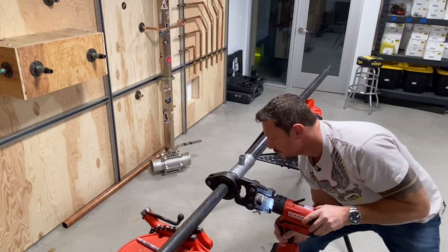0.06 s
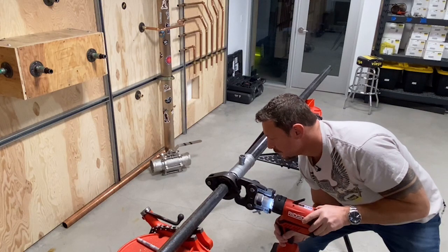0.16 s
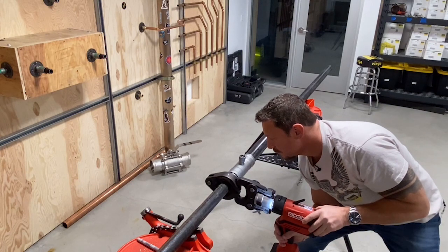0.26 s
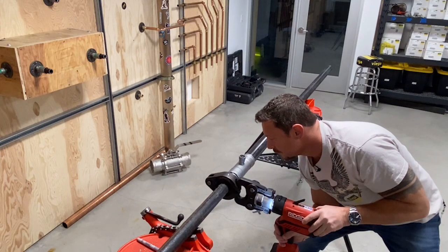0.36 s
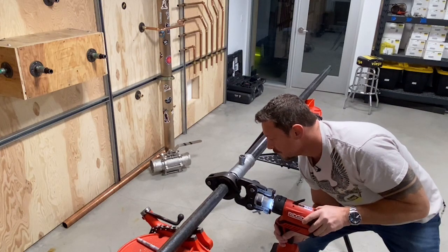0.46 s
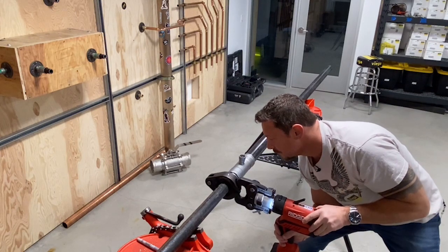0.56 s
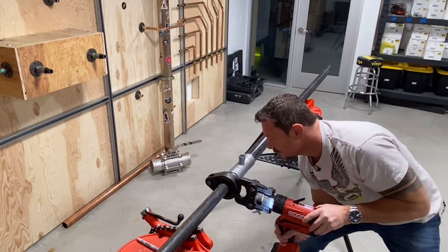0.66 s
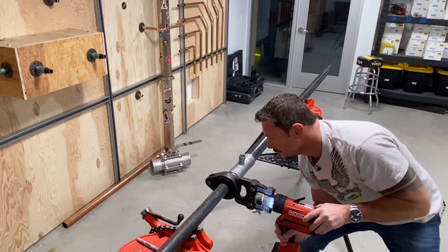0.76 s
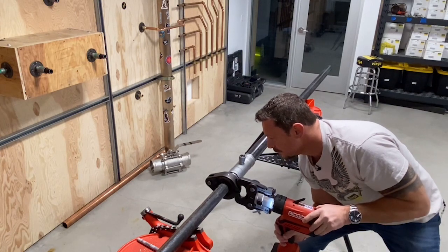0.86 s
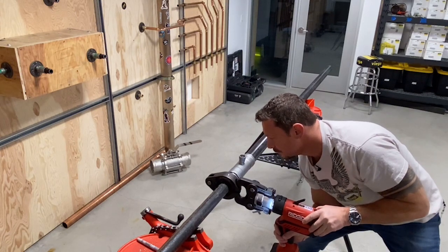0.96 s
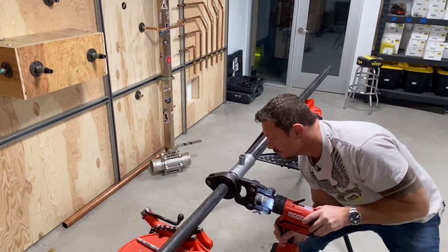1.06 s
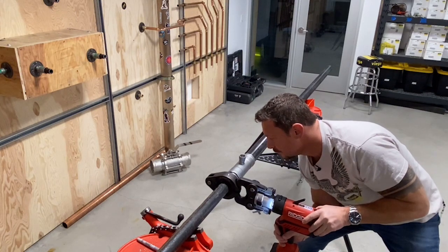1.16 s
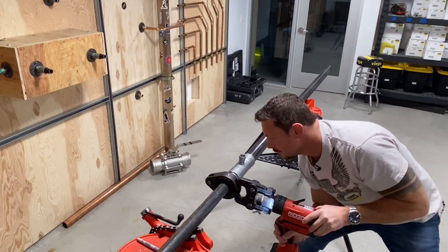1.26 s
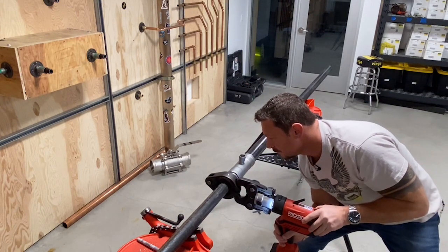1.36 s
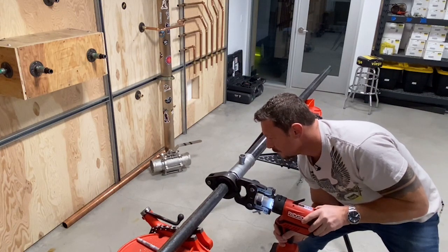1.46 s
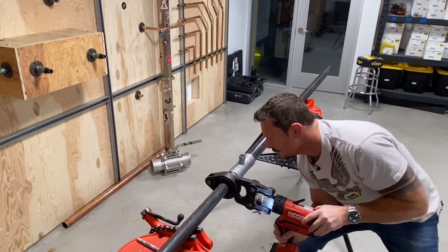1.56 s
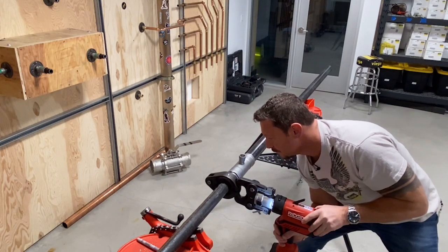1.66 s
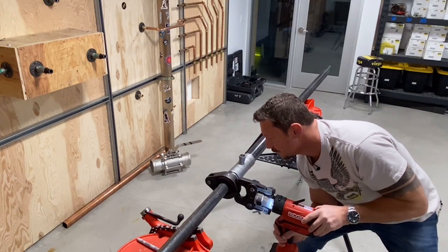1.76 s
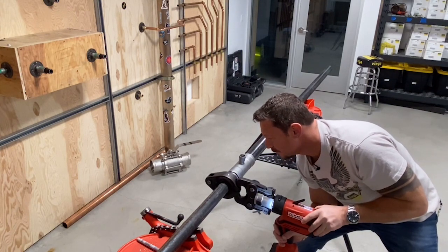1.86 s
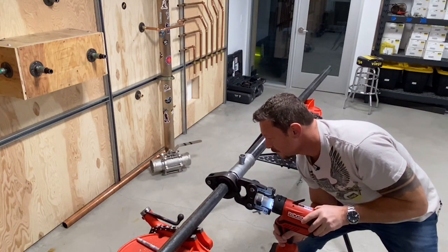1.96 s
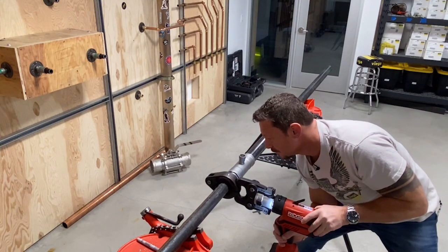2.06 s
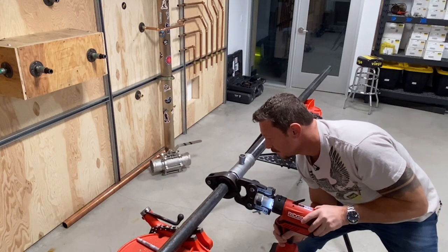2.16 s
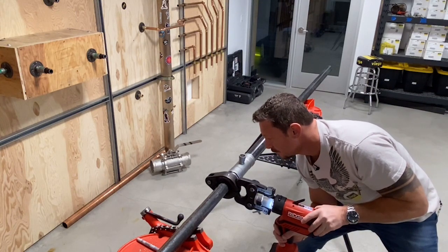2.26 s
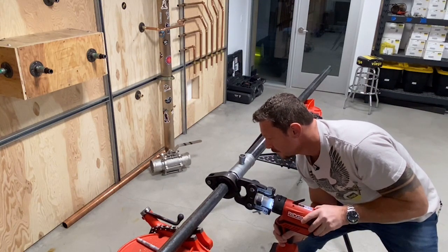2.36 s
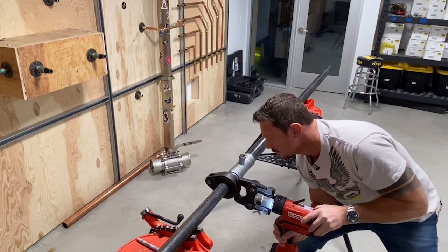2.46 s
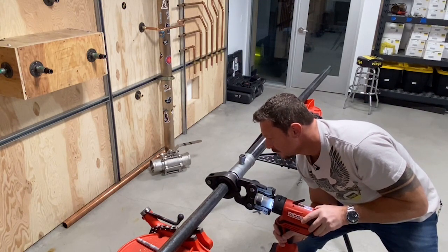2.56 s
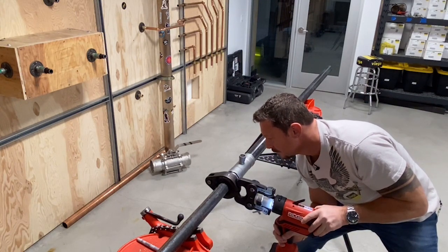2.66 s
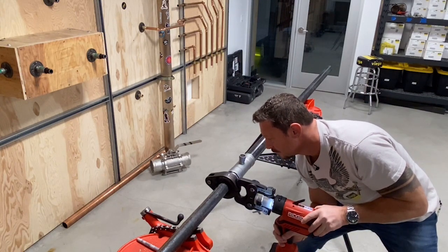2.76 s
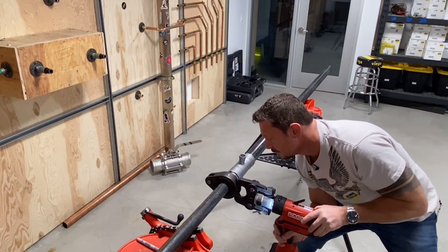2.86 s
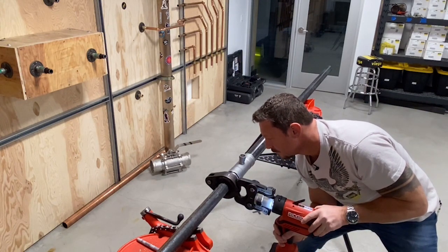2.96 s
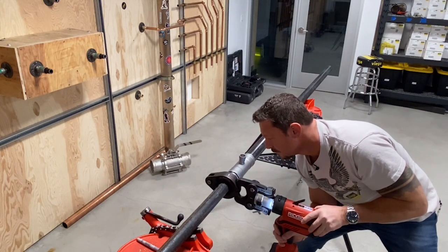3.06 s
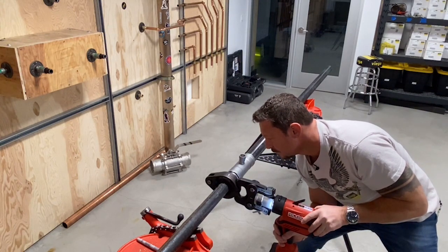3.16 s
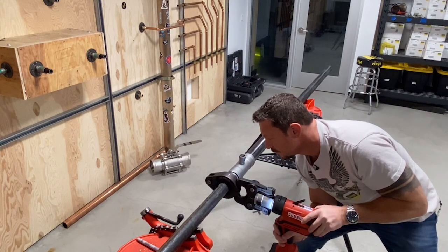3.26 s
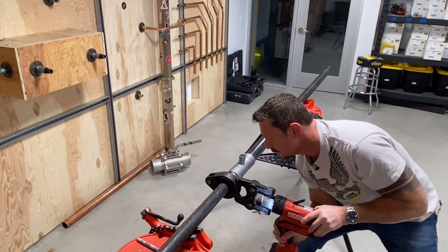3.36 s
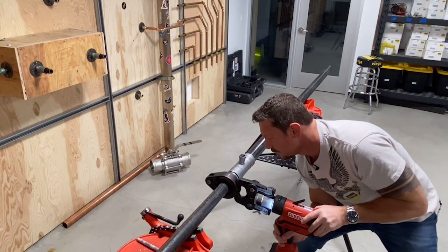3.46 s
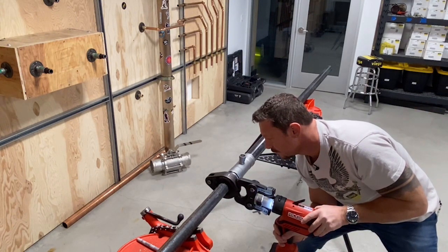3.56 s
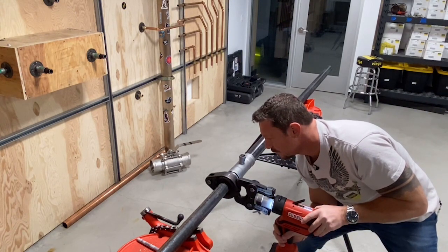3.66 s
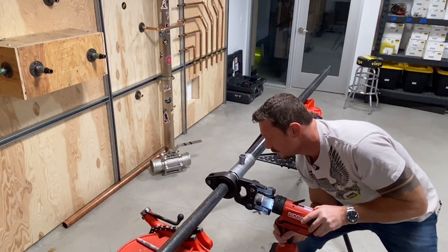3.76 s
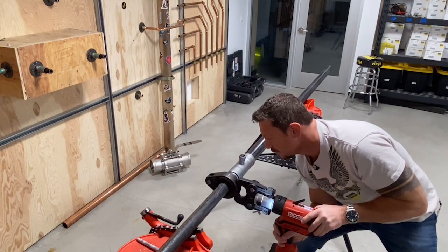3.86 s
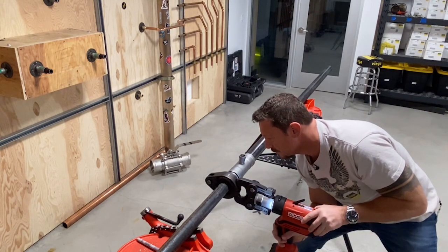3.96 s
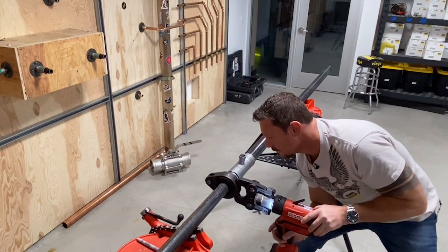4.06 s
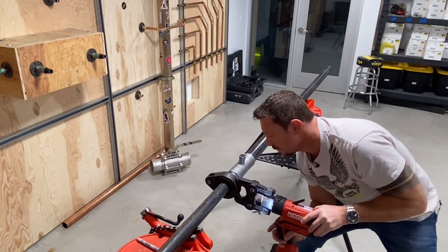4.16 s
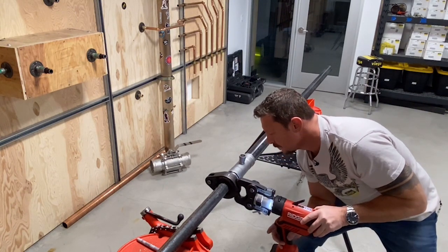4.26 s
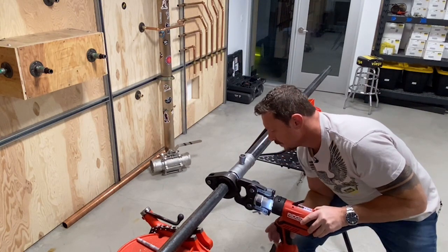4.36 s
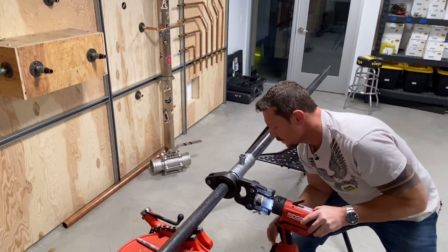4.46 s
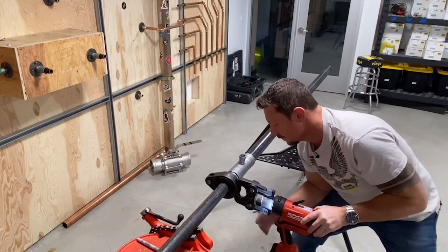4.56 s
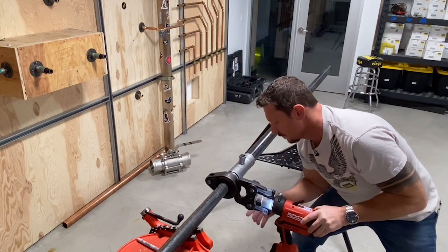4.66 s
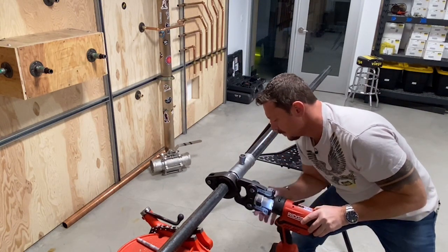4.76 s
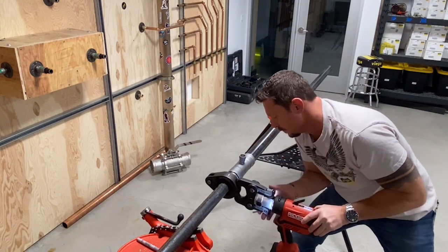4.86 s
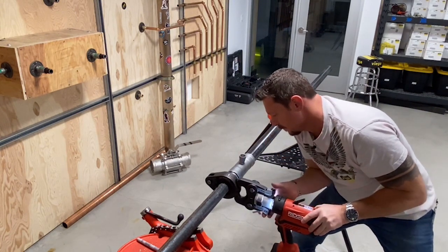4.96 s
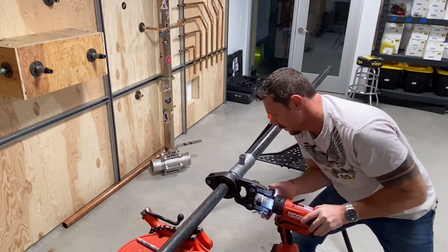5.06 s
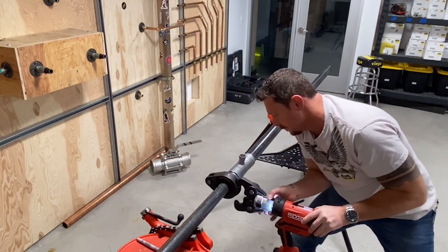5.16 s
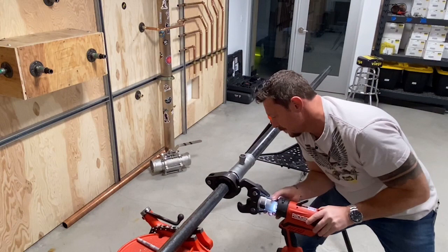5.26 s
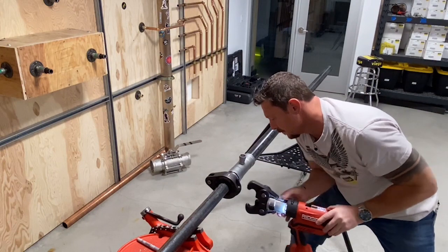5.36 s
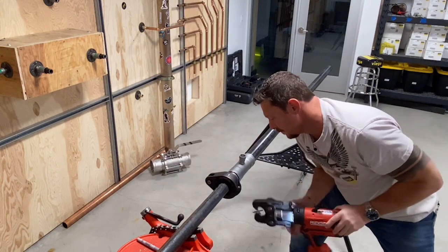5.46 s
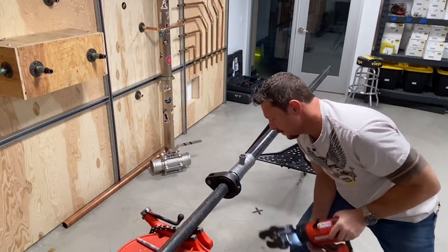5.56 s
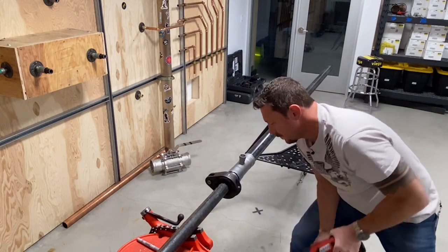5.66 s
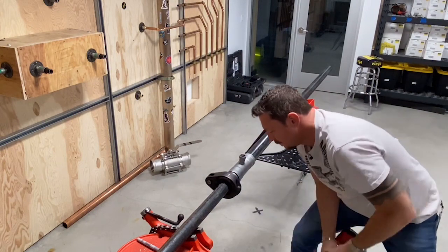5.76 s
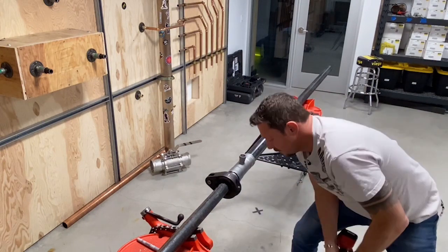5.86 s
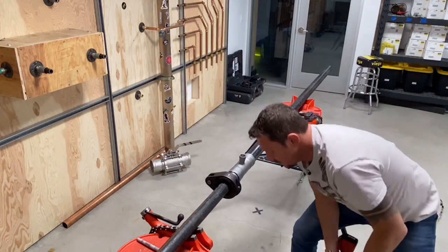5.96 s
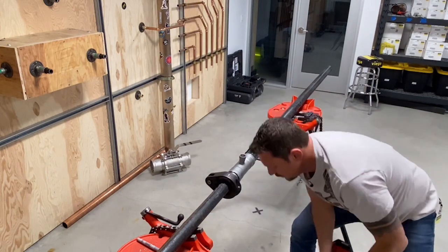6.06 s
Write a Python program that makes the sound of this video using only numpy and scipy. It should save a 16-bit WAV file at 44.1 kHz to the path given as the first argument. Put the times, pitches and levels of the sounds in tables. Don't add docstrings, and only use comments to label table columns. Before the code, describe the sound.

A low, soft ventilation rumble runs throughout in a hard-floored workshop with a reverberation of under a second. At the start, a faint metallic whirr from a previous run fades. At 0.2 s a battery press tool starts with a quick rising whoop, reaching full speed before 0.3 s. Its bright gear whine holds until about 0.6 s, then sags slowly, fluttering around fifty strokes per second, with increasingly rough buzzing, rattling and valve knocking. From 3.2 s it labours and drops more clearly. At 3.84 s a sharp tick and short low thump release the pressure, and the motor stops at once, leaving a brief tail. A small tick comes at 4.24 s and a fainter one at 5.13 s. Around 5.2 s steel scrapes lightly, then cracks loose very loudly at 5.25 s with a short ring. From 5.52 s jaws clack shut, bouncing faster and softer until about 5.65 s. A tiny tick falls at 5.99 s.

```python
import sys
import numpy as np
from scipy import signal
from scipy.fft import rfft, irfft
from scipy.io import wavfile
from scipy.ndimage import uniform_filter1d

SR = 44100
rng = np.random.default_rng(int(sys.argv[2]) if len(sys.argv) > 2 else 0)


def volts(x):
    e = np.asarray(x, float) / 20
    return 10 ** e


def to_wav(sig):
    pcm = np.clip(np.atleast_2d(sig), -1, 1) * 32767
    pcm = np.round(pcm).astype(np.int16)
    wavfile.write(sys.argv[1], SR, pcm.T)


N = 269010


def evened(x):
    return x / np.sqrt(np.mean(x ** 2) + 1e-20)


def read(points, hz):
    f, value = np.transpose(points)
    return np.interp(np.log(hz + 1), np.log(f + 1), value)


def coloured(x, points):
    gain = volts(read(points, np.fft.rfftfreq(len(x), 1 / SR)))
    return irfft(rfft(x) * gain, len(x))


def resonate(x, hz, width):
    r = np.exp(-np.pi * width / SR)
    return 2 * signal.lfilter([1 - r], [1, -r * np.exp(2j * np.pi * hz / SR)], x).real


def twice(x, hz, width, second):
    return resonate(resonate(x, hz, width), hz, second)


def highpass(x, hz):
    return signal.lfilter(*signal.butter(2, hz, "high", fs=SR), x)


def wander(hz):
    return evened(signal.lfilter(*signal.butter(2, hz, fs=SR), rng.standard_normal(N)))


def bump(turns, at, sharp):
    return np.exp(sharp * (np.cos(2 * np.pi * (turns - at)) - 1))


# frequency in Hz, level in dB.
VENTILATION = [(15, -59.5), (25, -29.5), (70, -20), (102, -9), (380, -12.5), (560, -24), (2610, -35),
               (16000, -53)]
# frequency in Hz, width in Hz, level in dB.
LAST_RUN = [(1893, 190, -49.5), (2270, 60, -51), (2560, 120, -57), (2980, 60, -56), (3970, 110, -52.5),
            (5800, 300, -76)]


def background():
    air_db = -48.5 + 0.78 * wander(hz=3.6)
    air = volts(air_db) * evened(coloured(rng.standard_normal(N), VENTILATION))
    noise = rng.standard_normal(N)
    last = sum(volts(db) * evened(twice(noise, hz, width, 4.6 * width)) for hz, width, db in LAST_RUN)
    last += volts(-51.5) * evened(twice(noise, 2200., 2500., 2300.))
    return air + last * volts(-70. * np.arange(N) / SR)


# start in seconds, peak level in dB.
LATCH_TICKS = [
    (4.2443, -40),
    (5.1344, -51.5),
    (5.9864, -44.5),
]


def ticks():
    out = np.zeros(N)
    u = np.arange(300) / SR
    for s, db in LATCH_TICKS:
        tick = np.diff(rng.standard_normal(301)) * np.exp(-u / .0012)
        out[round(s * SR):][:300] += volts(db) * tick / abs(tick).max()
    return out


def relief(s=3.8355, hz=328.0, db=2.0):
    u = np.clip(np.arange(N) / SR - s, 0, None)
    tick = volts(-3) * np.exp(-((u - .001) / .00012) ** 2)
    swell = (u / 0.002) ** 2 * np.exp(-u / 0.00092)
    return tick + volts(db + 9.5) * np.sin(2 * np.pi * hz * (u - .0028)) * swell


def bounces():
    first_s, gap_s, shrink = 5.5187, .0359, .735
    n = np.arange(7)
    s = first_s + gap_s * (1 - shrink ** n) / (1 - shrink)
    db, ms, tilt = 5 - 3.7 * n, 4.3 * .9 ** n, -2. - .4 * n
    return list(zip(s, db, ms, tilt))


# start in seconds, peak level in dB, contact in ms, tilt in dB per octave.
BREAKAWAY = [
    (5.204, -42, 6., -5.),
    (5.2285, -33, 9., -9.),
    (5.2355, -40, 5., -6.),
    (5.2432, -25, 7., -2.),
    (5.2535, 5, 10., 1.5),
]
# frequency in Hz, width in Hz, level in dB.
GRIPPING = [(1600, 120, -14), (3270, 100, -6), (4450, 170, 0), (6790, 170, -11), (7540, 110, -5),
            (8610, 120, -11), (9690, 230, -20), (10300, 130, -17), (11600, 99, -10), (13400, 180, -19),
            (13900, 83, -15), (14900, 100, -7)]
# frequency in Hz, width in Hz, level in dB.
CLOSED = [(1240, 330, -27), (1505, 220, 3), (2850, 330, -13), (3230, 380, -2), (3930, 710, 16),
          (4380, 190, 17), (5560, 300, -9), (6500, 580, 12), (7460, 250, -16), (8500, 290, -9),
          (10800, 220, -1), (13900, 220, -39.5), (14200, 220, -22.5)]
# frequency in Hz, level in dB, 60 dB decay time in seconds.
FREE_STEEL = [(727, -11, 0.26), (1550, 0, 0.9), (1760, -16, 0.25), (3000, -16, .45), (3280, -13, 0.7),
              (4037, -12, 0.29), (4365, -12, .5), (4430, -12, 0.45), (5911, -10, 0.15), (6700, -6, 0.15),
              (7531, -13, 0.33), (8619, -16, 0.33), (11660, -6, 0.28), (14920, -7, 0.19)]


def jaws():
    blows = BREAKAWAY + bounces()
    out, u = np.zeros(N), np.arange(30000) / SR
    grain, detune = rng.standard_normal((len(blows), 4000)), rng.standard_normal((len(blows), 20))
    for (s, db, ms, tilt), noise, vary in zip(blows, grain, detune):
        contact = np.zeros(len(u))
        contact[:4000] = noise * np.exp(-(1000 * u[:4000] / ms) ** 1.6)

        def lean(hz):
            return tilt * np.log2(hz / 4400)

        body, widen = (GRIPPING, 3.2) if s < 5.4 else (CLOSED, 1.1)
        held = np.zeros(len(u))
        for (hz, width, mode_db), v in zip(body, vary):
            held += volts(.55 * mode_db + lean(hz) + 1.5 * v) * twice(contact, hz, widen * width, 5 * width)
        free = np.zeros(len(u))
        for hz, mode_db, t60 in FREE_STEEL:
            free += volts(mode_db + lean(hz)) * resonate(contact, hz, 3 / t60) * t60 * hz / 8000
        crack = volts(.5 * lean(1300) + 1.5) * resonate(contact, 1200., 1500.)
        crack += resonate(contact, 3400., 3500.)
        crack += volts(lean(9000) - 5) * resonate(contact, 9000., 9000.)
        blow = highpass(held + volts(9) * free + volts(-4) * crack, 450)
        at = round(s * SR)
        out[at:at + len(u)] += volts(db) * (blow / abs(blow).max())[:N - at]
    u = np.clip(np.arange(N) / SR - 5.25, 0, None)
    jolt = volts(-25.5) * np.sin(2 * np.pi * 59.0 * u) * np.exp(-u / 0.009)
    return out + jolt


SPUN_UP_S = .275

# time in seconds, strokes per second.
SHAFT_SPEED = [(0.19, 26), (0.255, 52.6), (0.275, 54.8), (0.62, 54.95), (0.7, 52.75), (0.81, 51.34),
               (1.23, 49.95), (1.51, 48.56), (1.68, 48.4), (1.89, 47.08), (2.09, 47.6), (2.32, 46.75),
               (2.55, 47.55), (2.8, 46.45), (3.22, 47.12), (3.44, 44.75), (3.65, 42.7), (3.88, 38.7)]
VALVE_SEATING = [(.1, .29), (.27, .26), (.39, .35), (.55, .355), (.68, .31), (.85, .35)]


def shaft():
    free_speed, stop_speed = 55., 39.
    t = np.arange(N) / SR
    speed = np.interp(t, *np.transpose(SHAFT_SPEED))
    turns = np.cumsum(speed) / SR - .27
    sag = np.clip((free_speed - speed) / (free_speed - stop_speed), 0, 1)
    load = uniform_filter1d(sag * (t > SPUN_UP_S), size=5000)
    spin_up = sag * (t < SPUN_UP_S)
    pressure = np.clip(0.21 + 0.61 * load, 0, 1.3)
    swing = np.minimum(.015 + .165 * load ** 1.4, .16)
    seat = np.interp(load, *np.transpose(VALVE_SEATING))
    drag = 2 * np.pi * (turns - seat + .31)
    lag = np.cos(drag) + .09 * np.cos(2 * drag) - .8 * swing * np.sin(2 * drag)
    angle = 2 * np.pi * turns + .92 * swing * lag
    fast = bump(turns - seat, .5, 1.6 * pressure)
    return turns, angle, load, spin_up, pressure, swing, seat, fast


# multiple, idle level in dB, loaded level in dB.
MOTOR_ORDERS = [(1, -48, -47), (6, -43, -41), (24, -36, -27), (48, -22.5, -36)]


def motor(angle, pressure, fast):
    out = np.zeros(N)
    torque = np.clip(1.5 * pressure - .15, 0, 1)
    for k, idle_db, load_db in MOTOR_ORDERS:
        db = idle_db + (load_db - idle_db) * torque + 1.5 * wander(hz=8.)
        out += volts(db) * fast * np.cos(k * angle)
    return out


# multiple of the stroke rate, load, reach in load, level in dB.
LOAD_LINES = [(25, .45, .22, -29), (75, .46, .1, -33), (64, .65, .16, -33), (93, .82, .13, -29),
              (31, .92, .13, -30)]


def hum(turns, load):
    lines = np.zeros(N)
    for k, at, reach, db in LOAD_LINES:
        lines += volts(db) * np.exp(-((load - at) / reach) ** 2) * np.cos(2 * np.pi * k * turns)
    return lines


# frequency in Hz, level in dB.
RATTLE_SPECTRUM = [(150, -27), (450, -7.5), (1400, -7), (1700, -2.5), (2200, -11.5), (3800, 0.5),
                   (7000, -12), (16000, -19.5)]


def rattle(turns, pressure, seat):
    repeat = .65
    flaws = evened(rng.standard_normal(800)[(turns % 1 * 800).astype(int)])
    mixed = repeat * flaws + np.sqrt(1 - repeat ** 2) * rng.standard_normal(N)
    grit = evened(coloured(mixed, RATTLE_SPECTRUM))
    stroke = 1.34 * bump(turns, 0.1, 0.67) + bump(turns - seat, 0.0091, 12.0)
    return volts(-23.5) * grit * (0.63 + pressure * stroke)


# frequency in Hz, width in Hz, level in dB.
VALVE_MODES = [(632, 400, 1.5), (959, 544, 5.5), (1242, 700, -41), (1686, 73, 12)]


def valve(turns, pressure, seat):
    hit = np.diff(np.floor(turns - seat + .03), prepend=0) > 0
    hit = hit * volts(0.13 * rng.standard_normal(N))
    hit = hit * np.clip((pressure - .18) / 0.15, .03, 1) * volts(-4. * pressure ** 3)
    knock = sum(volts(db) * twice(hit, hz, width, 0.95 * width) for hz, width, db in VALVE_MODES)
    return volts(14.5) * highpass(knock, 260)


# load from 0 to 1, levels of tooth tones 1, 2, 3 and 4 in dB.
TOOTH_LEVELS = [(0, -30.5, -20, -32, -32.5), (.16, -26, -19.5, -23, -25.5), (.34, -24, -22, -20.5, -25.5),
                (.5, -22, -32.5, -22, -26.5), (.66, -23, -32, -25, -25), (.9, -25.5, -27.5, -26, -25)]
# tooth harmonic, level in dB relative to tone 4.
UPPER_TONES = [(5, -7.5), (6, -11), (7, -17.5)]
# frequency in Hz, width in Hz, level in dB.
HOUSING_MODES = [(1677, 130, -2), (2850, 340, 17.5), (3900, 110, 0), (4120, 82, -7), (5320, 870, 19),
                 (6810, 710, 17), (7730, 460, 4.5), (11130, 380, 20.5)]


def teeth(turns, angle, load, spin_up, pressure, swing, seat, fast):
    count = 35
    at_load, *columns = np.transpose(TOOTH_LEVELS)
    db1, db2, db3, db4 = [np.interp(load, at_load, c) for c in columns]
    db1 = db1 + 3 * np.clip(5 * spin_up, 0, 1) * (np.arange(N) / SR < SPUN_UP_S)
    db2 = db2 - 11.0 * spin_up
    mesh_hz = count * np.gradient(angle) * SR / (2 * np.pi)
    slack = .06 * wander(hz=40.) + .045 * wander(hz=400.)
    squeeze = bump(turns, .04, 3.) + .4 * bump(turns, 0., 14.)
    swell = 1 - np.clip(1.6 * pressure, 0, .9) * bump(turns - seat, .07, 2.5)
    stall = np.clip(swing / .12, 0, 1) ** 6 * bump(turns - seat, -.1, 6.)
    tones = [(1, db1, swell * (1.7 + 0.089 * fast)),
             (2, db2, swell * fast + 1.8 * stall),
             (3, db3, 0.15 + squeeze * (1 - .6 * load) + 0.9 * stall),
             (4, db4, 0.2 + squeeze)]
    tones += [(k, db4 + db, 0.14 + squeeze) for k, db in UPPER_TONES]
    out = np.zeros(N)
    for k, db, shape in tones:
        flare = 1
        for hz, width, gain_db in HOUSING_MODES:
            flare = flare + volts(gain_db) / (1 + (2 * (k * mesh_hz - hz) / width) ** 2)
        errors = sum(np.cos(m * angle + 2 * np.pi * rng.random()) for m in range(3, 7))
        skip = (k == 1) * np.clip(1 - 3 * pressure, 0, 1) * wander(hz=690.0)
        shape = shape * flare * (1 + .14 * errors + 2.2 * skip)
        steady = shape / np.sqrt(uniform_filter1d(shape ** 2, size=1900) / 2)
        level = steady * volts(db + .6 * wander(hz=60.))
        out += level * np.cos(k * (count * angle + slack) + 2 * np.pi * rng.random())
    return out


def press():
    start_s, stop_s = .192, 3.868
    turns, angle, load, spin_up, pressure, swing, seat, fast = shaft()
    out = teeth(turns, angle, load, spin_up, pressure, swing, seat, fast)
    out += motor(angle, pressure, fast) + hum(turns, load)
    out += rattle(turns, pressure, seat) + valve(turns, pressure, seat)
    t = np.arange(N) / SR
    return out * np.clip((t - start_s) / 0.021, 0, 1) ** 0.74 * np.clip((stop_s - t) / 0.014, 0, 1)


# frequency in Hz, 60 dB decay time in seconds.
REVERBERATION = [(200, 0.6), (530, 0.75), (1500, 0.9), (2800, .75), (4500, 0.5), (9700, 0.32)]


def room(x):
    taps = np.zeros(SR)
    at = np.arange(500, SR - 20, 20)
    taps[at + rng.integers(0, 20, len(at))] = rng.choice([-1., 1.], len(at))
    hz, t, z = signal.stft(taps, SR, nperseg=256)
    decay = volts(-60 * t / read(REVERBERATION, hz)[:, None])
    tail = signal.istft(z * decay, SR, nperseg=256)[1]
    return signal.fftconvolve(x, tail / np.linalg.norm(tail))[:N]


def scene():
    tool = volts(-1.23) * press() + relief()
    steel = jaws()
    slap = volts(-16.0) * np.roll(steel, round(0.021 * SR))
    reverb = room(volts(-13.5) * tool + volts(-11.5) * steel)
    return (tool + steel + slap + reverb + ticks() + background())[None]


def top_cut(x):
    return signal.sosfilt(signal.butter(12, 16470, fs=SR, output="sos"), x)


def record(dry):
    clipped = np.clip(dry, -.95, .95)
    lowpass = signal.firwin(301, 15900, window=("kaiser", 5), fs=SR)
    limited = signal.oaconvolve(clipped, lowpass[None], "same")
    return top_cut(limited)


dry = scene()
out = record(dry)
to_wav(out)
```